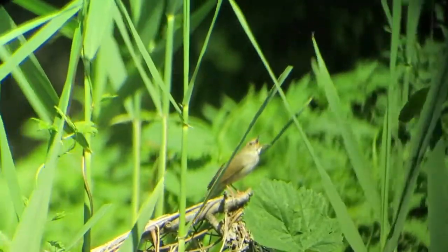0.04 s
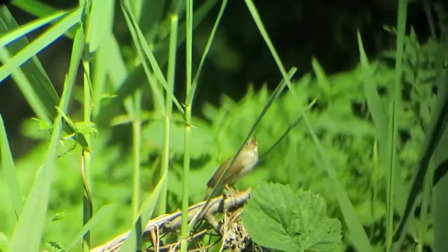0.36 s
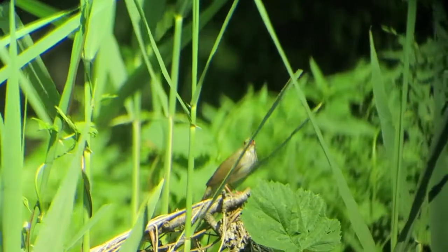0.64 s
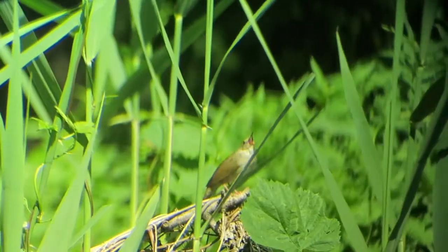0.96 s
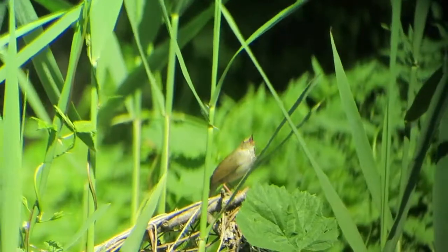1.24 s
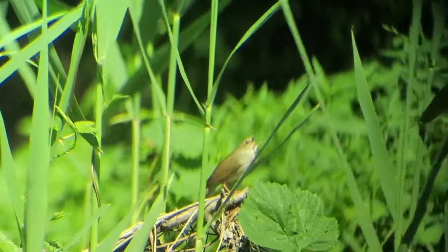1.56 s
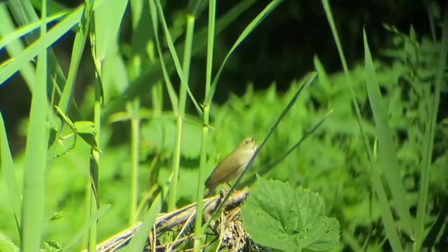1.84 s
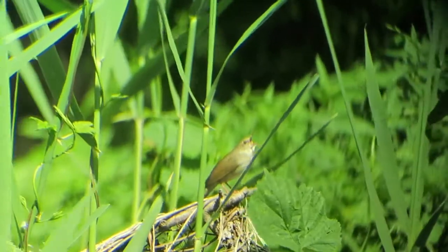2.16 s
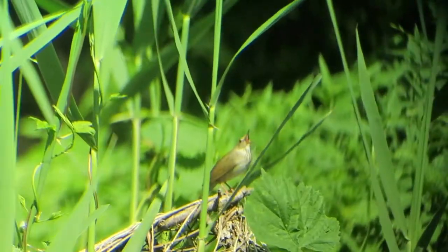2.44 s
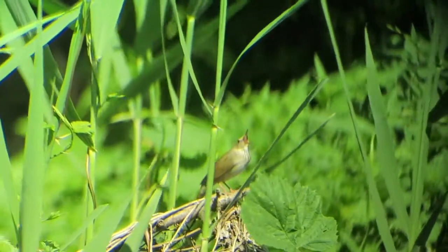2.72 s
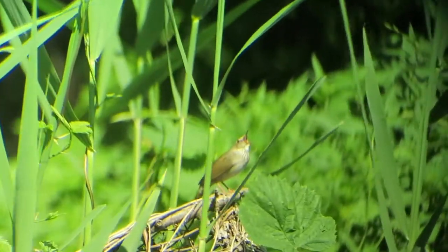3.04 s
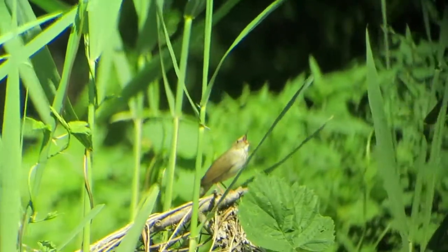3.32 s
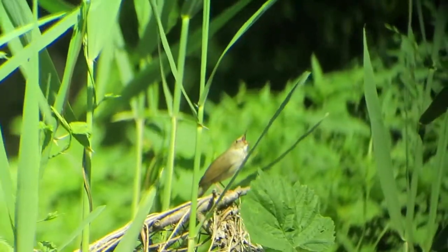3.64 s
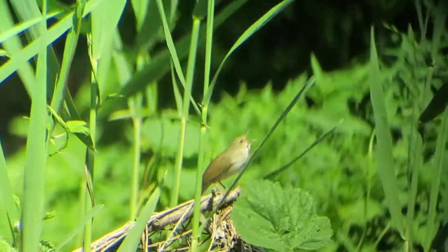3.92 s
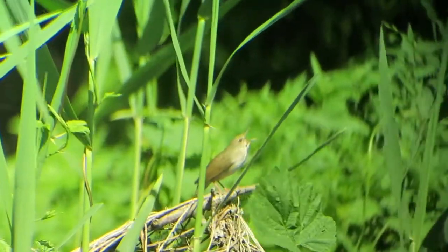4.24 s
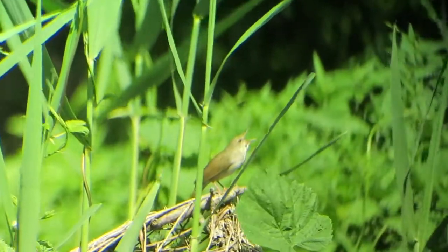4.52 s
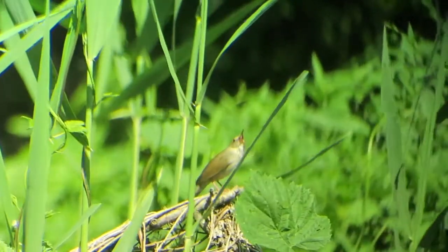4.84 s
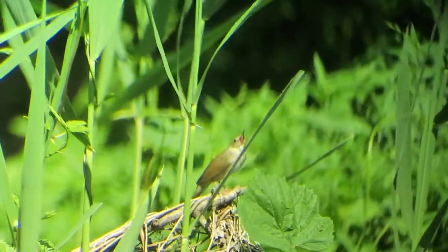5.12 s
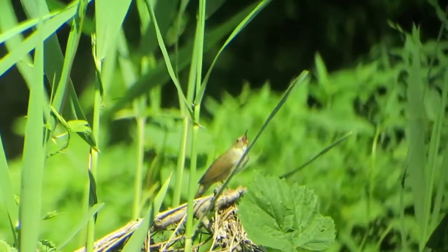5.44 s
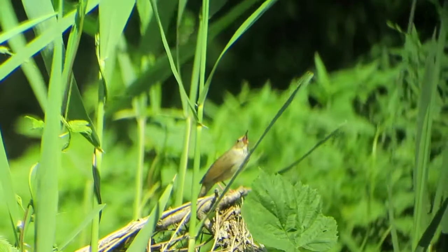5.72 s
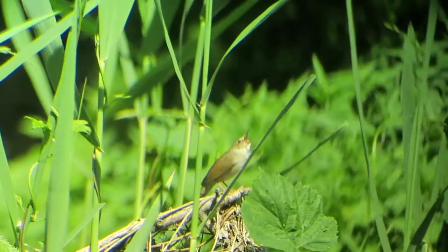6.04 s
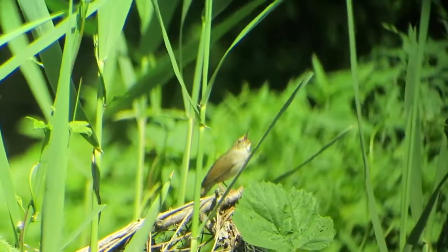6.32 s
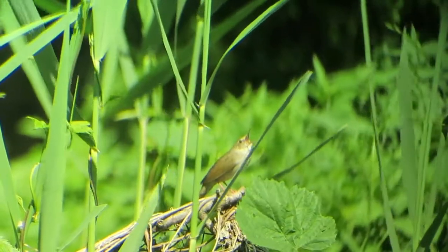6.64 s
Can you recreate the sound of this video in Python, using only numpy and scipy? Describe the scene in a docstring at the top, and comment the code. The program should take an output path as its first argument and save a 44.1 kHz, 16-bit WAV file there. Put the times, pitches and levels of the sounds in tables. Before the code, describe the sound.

A small bird sings a fast, high, insect-like trill close by while wind gusts rumble on the microphone.

```python
"""A river warbler trills close by in the reeds: about nine times a second a buzz of tiny falling
chirps runs into three short sine pips, and the song fades and returns as the bird turns its head.
Gusts buffet the microphone ports with lumpy low noise, flutter and thumps. Far off among the trees
a second songbird whistles and rasps. Under it all lies a soft meadow hiss; one dry stem ticks."""
import sys
import numpy as np
from scipy import signal
from scipy.fft import rfft, irfft, next_fast_len
from scipy.io import wavfile
from scipy.ndimage import uniform_filter1d, map_coordinates

SR = 44100
rng = np.random.default_rng(int(sys.argv[2]) if len(sys.argv) > 2 else 0)


def dump(signal):
    """Clip the signal to [-1, 1] and save it as 16-bit WAV at the path in sys.argv[1]."""
    limited = np.clip(np.atleast_2d(signal).T, -1, 1)
    pcm = np.round(limited * 32767).astype(np.int16)
    wavfile.write(sys.argv[1], SR, pcm)


N = 294147

# Colour of the meadow bed: f/Hz, relative level/dB
AIR_SPECTRUM = [(25, -18.5), (70, -4), (150, -0.5), (300, -14.5), (500, -15.5), (720, -10.5), (950, -20.5),
                (1800, -21), (4500, -24), (7000, -27), (8200, -41.5), (14500, -57.5)]
# Stereo width of the bed: f/Hz, left-right correlation
AIR_CORRELATION = [(60, 0.97), (230, 1), (910, 0.012), (1800, -0.2)]
# Cue for the stem tick: t/s, relative level/dB
STEM_TICKS = [(2.646, -51)]
# Ring of the stem: f/Hz, relative level/dB, t60/s
STEM_MODES = [(2460, 2, 0.014), (3600, 8, 0.023), (5670, 2, 0.029), (9140, -0.5, 0.0087)]
# Hoarse notes of the far bird: t/s, length/s, f/Hz, relative level/dB
FAR_RASPS = [(1.049, 0.68, 2750, -81), (1.752, 0.34, 2700, -81), (2.58, 0.12, 2810, -72),
             (3.873, 0.098, 4100, -79.5), (5.429, 0.33, 2670, -79)]
# Its whistles: t/s, length/s, start f/Hz, middle f/Hz, end f/Hz, relative level/dB
FAR_WHISTLES = [(0.031, 0.033, 3770, 3610, 3540, -68), (0.189, 0.061, 2610, 2604, 2650, -63),
                (0.368, 0.057, 2760, 2940, 2590, -61.5), (0.575, 0.077, 3670, 3510, 3330, -61.5),
                (0.682, 0.027, 3220, 3164, 3120, -59.5), (0.889, 0.064, 2325, 2704, 2645, -67),
                (2.496, 0.026, 3730, 3680, 3500, -64.5), (2.688, .024, 3080, 3800, 4530, -68),
                (2.979, 0.053, 3620, 3606, 3380, -58.5), (3.124, 0.07, 3700, 2840, 2420, -54.5),
                (3.298, 0.11, 2897, 2880, 2840, -51.5), (3.457, 0.043, 2620, 2644, 2330, -55.5),
                (3.665, 0.024, 3600, 3505, 3320, -61.5), (3.707, 0.052, 2986, 3580, 4360, -67),
                (4.036, 0.046, 3750, 3340, 3770, -58), (4.261, 0.057, 2730, 2744, 2810, -54.5),
                (4.328, 0.049, 2870, 3440, 4160, -65), (4.413, 0.091, 3360, 3670, 3380, -65.5),
                (4.573, 0.078, 3380, 3020, 2200, -64), (5.022, 0.024, 2870, 3920, 4700, -70),
                (5.728, 0.042, 3630, 4050, 4520, -70.5)]
# Gust cues: t/s, length/s, relative level/dB, right port against left/dB, brightness/dB
GUST_CUES = [(0.147, 0.033, -51, -12, -18.5), (0.344, 0.075, -43, -10, -16), (0.486, 0.13, -36.5, -9, -2.5),
             (0.886, 0.19, -31.5, -5.5, 3.5), (1.118, 0.17, -39.5, -11, -7), (1.411, 0.022, -43, -7.5, -4),
             (1.615, 0.21, -34, -5, -0.5), (1.804, 0.3, -30.5, -5, -4.5), (1.94, 0.18, -26, -10.5, 3),
             (2.133, 0.2, -30, -11.5, 4), (2.352, 0.11, -40.5, -11.5, 8), (2.416, 0.25, -32, -18.5, 7),
             (2.743, 0.041, -37, -24, 8), (2.997, 0.0075, -35.5, -9, 5.5), (3.334, 0.39, -46.5, -27, -1),
             (3.474, 0.15, -36, -18, 9.5), (3.839, 0.046, -36.5, -22, -1.5),
             (3.967, 0.18, -37.5, -22.5, -0.5), (4.205, 0.12, -39, -13, 2.5),
             (4.811, 0.17, -51.5, -22.5, -12), (5.636, 0.12, -44.5, -23, -0.5),
             (5.814, 0.04, -43.5, -18, -4.5), (5.88, 0.34, -40.5, -26.5, -11), (6.345, 0.68, -49, -3, -3),
             (6.435, 0.084, -32, -7, -0.5), (6.588, 0.51, -33.5, -2, -7)]
# Colour of the wind's body: f/Hz, relative level/dB
BUFFET_SPECTRUM = [(25, -42.5), (50, -20), (105, -2), (175, 1), (310, -1.5), (460, -7), (560, -24),
                   (760, -27.5), (1000, -67.5), (2200, -120)]
# Colour of the flutter above it: f/Hz, relative level/dB
FLUTTER_SPECTRUM = [(300, -25.5), (520, 11), (750, -9.5), (900, -1), (1200, -6), (1550, -18.5),
                    (2400, -38.5), (5000, -120)]
# Single eddies hitting the ports: t/s, relative level/dB, f/Hz
EDDY_THUMPS = [(0.311, -40.5, 413), (0.555, -23, 176.7), (0.604, -25, 235), (0.941, -17, 216),
               (0.969, -22.5, 236.2), (1.061, -31.5, 338), (1.124, -32, 237), (1.172, -20, 204),
               (1.619, -27.5, 174), (1.672, -37.5, 744), (1.823, -23, 181), (2.08, -19, 198),
               (2.081, -36.5, 1183), (2.222, -22.5, 271), (2.255, -15.5, 149), (2.431, -24.5, 244),
               (2.521, -20, 258), (2.756, -24.5, 197.5), (3.013, -33, 218), (3.337, -34.5, 272),
               (3.515, -25.5, 274), (3.851, -25.5, 213), (3.987, -26, 139), (4.13, -26, 396),
               (4.236, -18.5, 180), (4.329, -36, 392), (4.443, -34, 240), (4.937, -30.5, 317),
               (5.158, -39.5, 163), (5.893, -22.5, 298), (5.945, -22, 178.5), (6.123, -24.5, 206),
               (6.27, -32.5, 265), (6.471, -17.5, 254)]
# Bleed from each port into the other channel: f/Hz, level/dB
PORT_BLEED = [(60, -5), (200, -11), (450, -25.5), (900, -16)]
# The warbler's low, high and middle pip: offset/s, length/s, f/Hz, fall/Hz, pitch scatter/Hz,
# level/dB, share of the beam, octave level/dB, left lead/rad, lead scatter/rad, skew
SYLLABLE_PIPS = [(-.0098, 0.0082, 5750, 399, 45, -48.5, 1, -29, 1.3, 0.46, 0.8),
                 (0, 0.012, 7280, 201, 35, -62, 0.79, -17, -1.37, 0.37, 1),
                 (0.0393, 0.0108, 6630, 280, 40, -55, 0, -32.5, 2, 0.16, 1)]
# The song's beam toward the microphone as the head swings: t/s, relative level/dB
HEAD_BEAM = [(0, -2), (.45, -6), (.85, 2.5), (1.298, 0), (1.55, -8), (1.749, -11.5), (2.05, 2.5),
             (2.3, -3.5), (2.881, 2.5), (3.121, -8), (3.35, 1), (3.75, -2.5), (4.031, -16), (4.3, -31.5),
             (4.55, -20.5), (4.921, -13), (5.19, -1), (5.5, -12.5), (5.652, -2), (5.902, -3), (6.249, -16),
             (6.449, -2.5), (6.67, -13.5)]
# Accents on the high pip: t/s, relative level/dB
HIGH_ACCENTS = [(5.181, 6), (5.29, -9), (5.451, -0.5), (5.95, 4.5), (6.201, 16.5), (6.449, 5)]
# Accents on the middle pip, now and then nearly swallowed: t/s, relative level/dB
MIDDLE_ACCENTS = [(0, 0), (.38, -2.5), (0.599, 6), (1.3, 4), (1.751, 0.5), (2.551, -1.5), (2.89, 0.5),
                  (3, -15), (3.12, -10), (3.24, 1.5), (4.15, 3.5), (4.3, -2), (4.6, 1.5), (4.95, -4.5),
                  (5.06, 5.5), (5.4, -2), (5.519, -9), (5.86, 4), (6.089, -6), (6.55, -1.5)]
# Extra high pips slipped into the buzz: t/s, level/dB
EXTRA_PIPS = [(6.057, -60), (6.184, -63)]
# How hard the bird pushes the buzz: t/s, relative level/dB
BUZZ_EFFORT = [(0, -54), (0.379, -60.5), (0.559, -45.5), (0.851, -44.5), (1.1, -52.5), (1.75, -54.5),
               (2.2, -54), (2.499, -50.5), (2.851, -46.5), (3.05, -60), (3.3, -49), (4.149, -62),
               (4.75, -60), (5.951, -51), (6.6, -60.5)]
# Sizzle on top of the buzz: t/s, relative level/dB
BUZZ_SIZZLE = [(0, -90), (.3, -101), (0.75, -68.5), (1.151, -79), (1.399, -83), (2.7, -80), (3.001, -98),
               (3.25, -78.5), (4.3, -94), (4.598, -76), (5.249, -100), (5.7, -75), (6.201, -89)]

PORT_LEAD_RAD = 1.58  # the wind reaches the right port first
BUZZ_START_S, BUZZ_END_S = .045, .099  # after the high pip
BUZZ_HZ, BUZZ_SAG_HZ_PER_S = 5370, 80  # bottom of the pitch dip, sinking as the song goes on
PULSES_PER_S, PACE_SCATTER, BUZZ_SLOWING = 340, .1, .3  # opening rate, relative spread, share lost
CLICK_DB, CLICK_S, CLICK_HZ = -26.5, .0021, 9400  # gritty click in the low pip, level against that pip


def amp(db):
    """Decibels to gain."""
    return 10 ** (np.asarray(db) / 20)


def unit(x):
    """x at rms 1."""
    return x / np.sqrt(np.mean(x ** 2) + 1e-20)


def at_time(s, rows):
    """Read a (t, value) curve at time s."""
    return np.interp(s, *np.transpose(rows))


def at_hz(hz, rows):
    """Read an (f, value) curve on a log frequency axis."""
    f, values = np.transpose(rows)
    return np.interp(np.log(hz + 1), np.log(f + 1), values)


def wobble(rate):
    """Smooth random modulation, rate knots a second."""
    knots = rng.standard_normal(int(N * rate / SR) + 4)
    return map_coordinates(knots, [np.arange(N) * rate / SR])


def filtered(x, response):
    """EQ x with a response given as a function of frequency."""
    m = next_fast_len(N + SR // 2)
    return irfft(rfft(x, m) * response(np.fft.rfftfreq(m, 1 / SR)), m)[..., :N]


def add(track, s, sound):
    """Mix a sound into a stereo track at time s."""
    i = round(s * SR)
    a, b = max(i, 0), min(i + sound.shape[-1], N)
    if b > a:
        track[:, a:b] += sound[..., a - i:b - i]


def tone(hz, lead, octave_db):
    """A sine following hz, with a weak octave; left leads right by lead radians."""
    phase = 2 * np.pi * (np.cumsum(hz) / SR + rng.random()) + np.array([[lead], [-lead]]) / 2
    return np.sin(phase) + amp(octave_db) * np.sin(2 * phase)


def foliage_echo(x, t60):
    """Diffuse stereo echo of the left channel; swaying leaves crossfade two noise tails."""
    t = np.arange(SR // 2) / SR
    tails = rng.standard_normal((2, 2, len(t))) * amp(-60 * t / t60) * (1 - np.exp(-t / .00091))
    tails /= np.linalg.norm(tails, axis=-1, keepdims=True)
    a, b = signal.fftconvolve(x[:1, None], tails, axes=-1)[..., :N]
    sway = 2 * wobble(3.4)
    return a * np.cos(sway) + b * np.sin(sway)


def meadow_air(db=-71, flicker_db=2):
    """A soft, steady meadow hiss, with the blotchy flicker of audio data compression."""
    def mid_side_eq(hz):
        width = np.arccos(np.clip(at_hz(hz, AIR_CORRELATION), -1, 1)) / 2
        return amp(at_hz(hz, AIR_SPECTRUM)) * [np.cos(width), np.sin(width)]

    mid, side = filtered(rng.standard_normal((2, N)), mid_side_eq)
    bed = signal.stft(unit(np.array([mid + side, mid - side])), nperseg=512)[2]
    flicker = uniform_filter1d(rng.standard_normal(bed.shape[1:]), size=5, axis=0)
    flicker = unit(uniform_filter1d(flicker, size=8, axis=1))
    return amp(db) * signal.istft(bed * amp(flicker_db * flicker))[1][:, :N]


def stem_tick(gain_db=-.5):
    """A dry reed stem ticks and scrapes briefly as it bends."""
    out, t = np.zeros((2, N)), np.arange(SR // 10) / SR
    attack = 1 - np.exp(-t / .0005)
    for s, db in STEM_TICKS:
        ring = sum(amp(level - 60 * t / t60) * tone(np.full(len(t), hz), lead=1.7, octave_db=-54)
                   for hz, level, t60 in STEM_MODES)
        scrape = amp(-60 * t / .13) * uniform_filter1d(rng.standard_normal((2, len(t))), size=4)
        add(out, s - .001, amp(db + gain_db) * (ring + .42 * scrape) * attack)
    return out


def far_rasps(width_hz=400, chatter_db=5):
    """Soft hoarse notes: a narrow, chattering band of noise around each pitch."""
    out = np.zeros((2, N))
    for s, length, hz, db in FAR_RASPS:
        n = int(length * SR)
        band = np.exp(-.5 * ((np.fft.rfftfreq(n, 1 / SR) - hz) / width_hz) ** 2)
        noise = irfft(rfft(rng.standard_normal(n)) * band, n)
        chatter = map_coordinates(rng.standard_normal(N // 100), [np.arange(n) * 100 / SR])
        add(out, s, amp(db) * unit(noise * amp(chatter_db * chatter)) * np.sqrt(np.hanning(n)))
    return out


def far_bird(gain_db=-1, wet_db=-1, waver=.016, flicker_db=3.6, pan_db=1.8):
    """Slurred, wavering whistles and hoarse notes, a little to the left, smeared by the trees."""
    whistles = np.zeros((2, N))
    vibrato = 1 + waver * wobble(260)
    for s, length, first, middle, last, db in FAR_WHISTLES:
        u = np.linspace(0, 1, int(length * SR))
        slur = np.polyval(np.polyfit([0, .5, 1], [first, middle, last], 2), u)
        hz = slur * vibrato[int(s * SR):][:len(u)]
        envelope = np.abs(np.sin(np.pi * u)) ** .64
        add(whistles, s, amp(db + gain_db) * envelope * tone(hz, lead=1.17, octave_db=-43))
    song = whistles * amp(flicker_db * wobble(110)) + far_rasps()
    return song * amp([[pan_db], [-pan_db]]) + amp(wet_db) * foliage_echo(song, t60=.16)


def gusts(attack_s=.017, release_s=.023, sag_db=3,
          breeze_db=-66, puff_db=7, breeze_right_db=-8, breeze_tilt_db=-5.5):
    """Wind strength per port, and brightness: gusts hit fast, sag and die over a dull, fitful breeze."""
    t = np.arange(N) / SR
    power = (amp(breeze_db + puff_db * wobble(17)) * amp([[0], [breeze_right_db]])) ** 2
    tilt = breeze_tilt_db * power[0]
    for s, length, db, right_db, bright_db in GUST_CUES:
        attack = np.clip((t - s) / attack_s, 0, 1)
        sag = amp(-sag_db * np.clip((t - s) / length, 0, 1))
        release = np.exp(-np.maximum(t - s - length, 0) / release_s)
        gust = (attack * sag * release * amp([[db], [db + right_db]])) ** 2
        power += gust
        tilt += bright_db * gust[0]
    return np.sqrt(power), tilt / power[0]


def turbulence(spectrum, lump_db, shared=0, leveller_s=.045):
    """Lumpy pressure ridden to rms 1; the right port may share part of it, a little ahead of the left."""
    lumps = wobble(50) + 1.215 * np.array([wobble(110), wobble(110)])
    left, own = amp(lump_db * lumps) * rng.standard_normal((2, N))
    ahead = filtered(left, lambda hz: np.exp(1j * PORT_LEAD_RAD * np.tanh(hz / 220)))
    right = shared * ahead + np.sqrt(1 - shared ** 2) * own
    pressure = filtered(np.array([left, right]), lambda hz: amp(at_hz(hz, spectrum)))
    window = np.hanning(int(2 * leveller_s * SR))
    power = signal.fftconvolve(np.mean(pressure ** 2, axis=0), window / window.sum(), "same")
    return pressure / np.sqrt(np.abs(power))


def eddies(rise_s=.004, gain_db=-.5, droop=.1):
    """Each eddy is a quick thump of a few cycles that sinks in pitch and reaches the right port first."""
    out, t = np.zeros((2, N)), np.arange(SR // 20) / SR
    swell = (t / rise_s * np.exp(1 - t / rise_s)) ** 2
    for s, db, hz in EDDY_THUMPS:
        cycles = np.cumsum(hz * (1 + droop * np.tanh(1 - t / rise_s))) / SR + rng.random()
        phase = 2 * np.pi * cycles + np.array([[0], [PORT_LEAD_RAD]])
        add(out, s, amp(db + gain_db) * swell * np.sin(phase))
    return out


def wind(flutter_db=-26.5, steepness=.88, strong_db=-32, build_s=1.0, pivot_hz=270, rumble_hz=85):
    """Gusts hit mainly the left port and bleed across; strong, lasting ones flutter higher up on both."""
    strength, tilt_db = gusts()
    buffet = turbulence(BUFFET_SPECTRUM, lump_db=3.5, shared=.83)
    deep = filtered(buffet, lambda hz: 1 / (1 + (hz / pivot_hz) ** 4))
    rumble = filtered(deep, lambda hz: np.exp(-(hz / rumble_hz) ** 2))
    # Three-band tilt EQ: bright gusts trade weight for edge.
    body = (rumble * amp(-.7 * tilt_db) + (deep - rumble) * amp(-.35 * tilt_db)
            + (buffet - deep) * amp(.7 * tilt_db))
    lasting = np.sqrt(np.abs(uniform_filter1d(strength[0] ** 2, int(build_s * SR))))
    drive = strength[0] * (lasting / amp(strong_db)) ** steepness
    flutter = amp(flutter_db) * drive * turbulence(FLUTTER_SPECTRUM, lump_db=6.5)
    thumps = filtered(eddies(), lambda hz: hz ** 2 / (hz ** 2 + rumble_hz ** 2))
    ports = strength * body + thumps * strength / strength[0] + flutter
    bleed_eq = lambda hz: amp(at_hz(hz, PORT_BLEED)) * np.exp(1j * np.pi * np.minimum(hz / 1000, 1))
    return ports + filtered(ports[::-1], bleed_eq)


def syllables(first_s=.037, period_s=.11423, sway_s=.002, sway_period_s=4.1, latest_at_s=2.55):
    """The time of each high pip: the bird slowly drags and hurries around a steady beat."""
    beats = np.arange(first_s, N / SR, period_s)
    return beats + sway_s * np.cos(2 * np.pi * (beats - latest_at_s) / sway_period_s)


def pip(length, hz, fall_hz, lead, octave_db=-120, rough=0, skew=1):
    """A short, rounded, falling note; rough shakes its pitch, skew under 1 sharpens its attack."""
    u = np.linspace(0, 1, int(length * SR))
    tremble = map_coordinates(rng.standard_normal(10), [u * 6])
    pitch = hz * (1 + rough * tremble) + fall_hz * (.5 - u)
    return np.sin(np.pi * u ** skew) ** 2 * tone(pitch, lead, octave_db)


def buzz(pulse_s=.0042, fall_hz=700, glide_hz=450, dip_at=.7, swell_db=7, gain_db=-14, scatter_db=3,
         grit_hz=6650, grit_db=-5, grit_fade_db=14, sizzle_hz=12100, sizzle_swell_db=8):
    """A slowing train of tiny chirps dips in pitch and swells toward the pips; grit yields to sizzle."""
    out = np.zeros((2, N))
    for s in syllables():
        pace, shift, push = rng.standard_normal(3)
        rate = PULSES_PER_S * np.exp(PACE_SCATTER * pace)
        hz = BUZZ_HZ - BUZZ_SAG_HZ_PER_S * s
        effort = amp(at_time(s, BUZZ_EFFORT) + gain_db)
        sizzle_db = at_time(s, BUZZ_SIZZLE) + 2 * push + 2
        offset = BUZZ_START_S
        while offset < BUZZ_END_S:
            u = (offset - BUZZ_START_S) / (BUZZ_END_S - BUZZ_START_S)
            jitter, size, detune, turn = rng.standard_normal(4)
            bend_hz = glide_hz * (1 - u / dip_at) ** 2 + 110 * (detune + shift)
            chirp = pip(pulse_s, hz + bend_hz, fall_hz, lead=3 + .5 * turn, octave_db=-46, rough=.022)
            grit = pip(pulse_s, grit_hz, fall_hz, lead=2 + turn, rough=.022)
            sizzle = pip(pulse_s, sizzle_hz + bend_hz + 280 * shift, fall_hz, lead=2.36, rough=.03)
            pulse = effort * (amp(swell_db * u ** 2) * chirp + amp(grit_db - grit_fade_db * u) * grit)
            pulse += amp(sizzle_db + sizzle_swell_db * (u - 1)) * sizzle
            add(out, s + offset + .0003 * jitter, amp(scatter_db * size) * pulse)
            offset += 1 / (rate * (1 - BUZZ_SLOWING * u))
    return out


def pips(scatter_db=1.7, lead_rad_per_db=.028):
    """Three pips a syllable: low with a click, high, middle. The first two fade as the head turns away."""
    out = np.zeros((2, N))
    for s in syllables():
        beam_db = at_time(s, HEAD_BEAM)
        accents = [0, at_time(s, HIGH_ACCENTS), at_time(s, MIDDLE_ACCENTS)]
        for row, accent_db, clicks in zip(SYLLABLE_PIPS, accents, (True, False, False)):
            offset, length, hz, fall_hz, scatter_hz, db, share, octave_db, lead, spread, skew = row
            detune, turn, pan, size, stretch, snap = rng.standard_normal(6)
            length *= amp(stretch)
            hz += scatter_hz * detune
            lead += spread * turn - lead_rad_per_db * beam_db  # a turned head sends pips in sideways
            gain = amp(db + accent_db + share * beam_db + scatter_db * size + pan * np.array([[1], [-1]]))
            note = pip(length, hz, fall_hz * amp(2 * snap), lead, octave_db, rough=.012, skew=skew)
            add(out, s + offset - length / 2, gain * note)
            if clicks:
                click = pip(CLICK_S, CLICK_HZ, CLICK_HZ / 2, lead, octave_db, rough=.13)
                add(out, s + offset - CLICK_S, gain * amp(CLICK_DB + 2 * snap) * click)
    _, length, hz, fall_hz, _, _, _, octave_db, lead, *_ = SYLLABLE_PIPS[1]
    for s, db in EXTRA_PIPS:
        add(out, s - length / 2, amp(db) * pip(length, hz, fall_hz, lead, octave_db))
    return out


def warbler(wet_db=-10):
    """The lead voice, up close, with a short echo from the reeds around it."""
    song = pips() + buzz()
    return song + amp(wet_db) * foliage_echo(song, t60=.11)


def scene():
    """The mix: wind, meadow bed, stem tick and both birds."""
    return wind() + meadow_air() + stem_tick() + far_bird() + warbler()


def record(dry, low_cut_hz=28, top_hz=15200):
    """The camera thins the deepest rumble and keeps nothing above its band limit."""
    return filtered(dry, lambda hz: (hz < top_hz) * hz ** 2 / (hz ** 2 + low_cut_hz ** 2))


dry = scene()
out = record(dry)
dump(out)
```